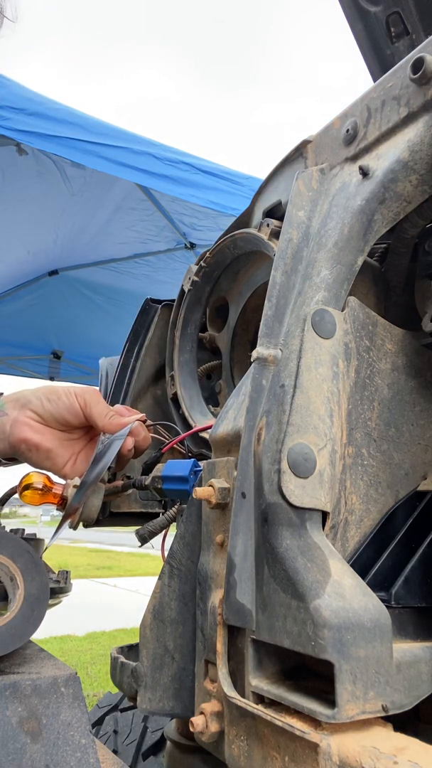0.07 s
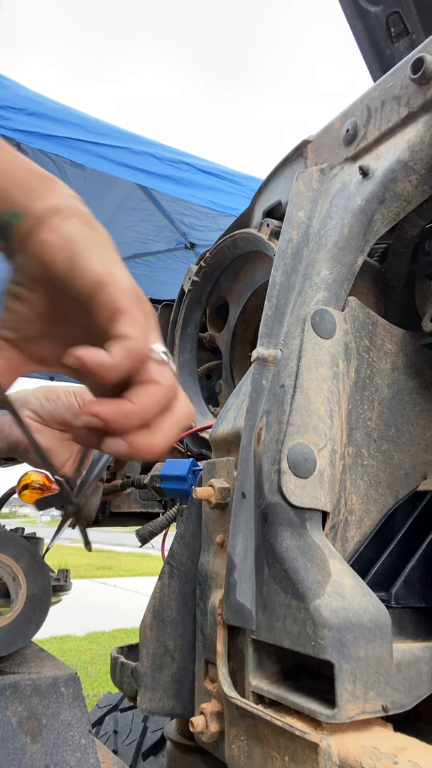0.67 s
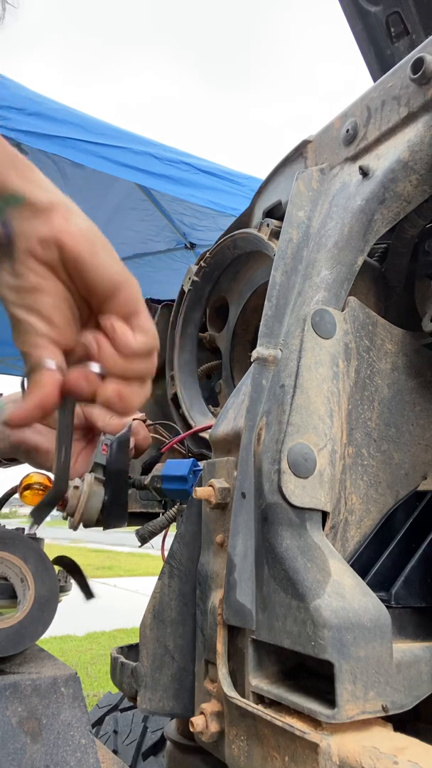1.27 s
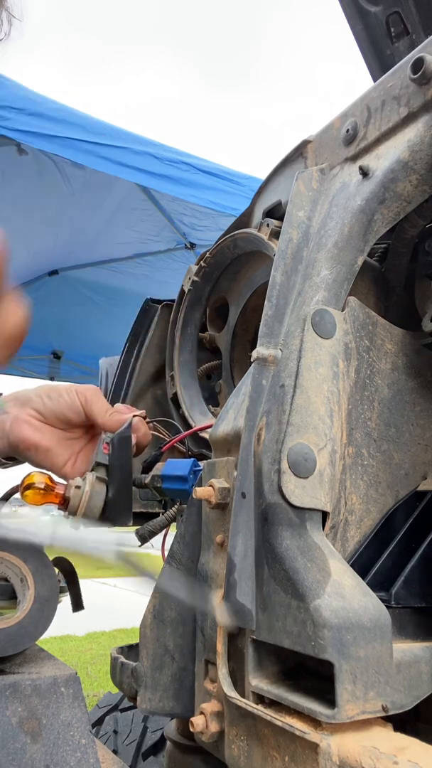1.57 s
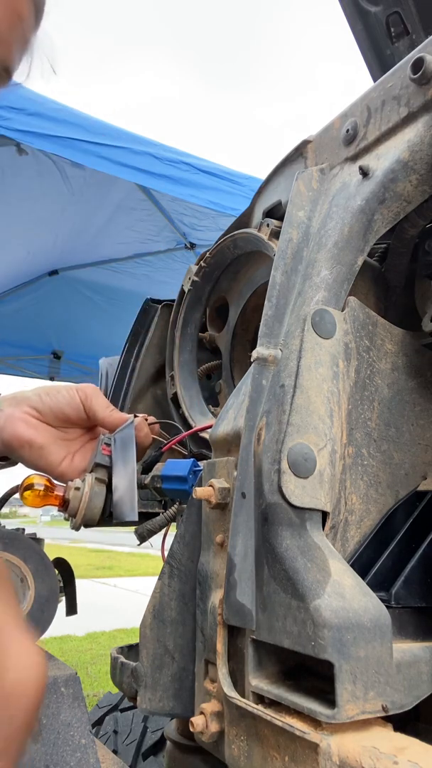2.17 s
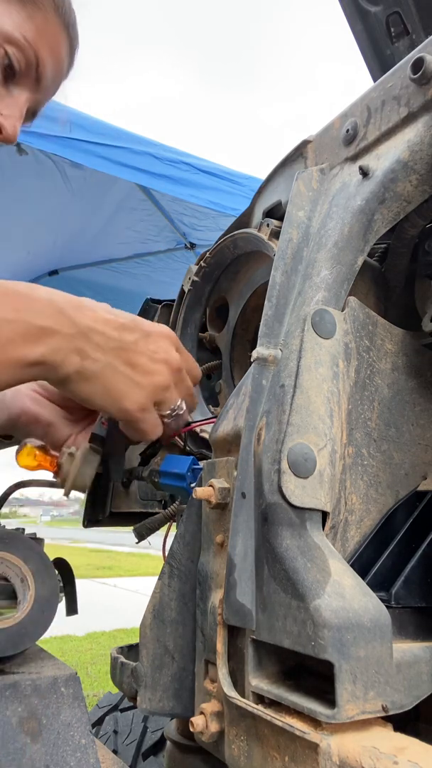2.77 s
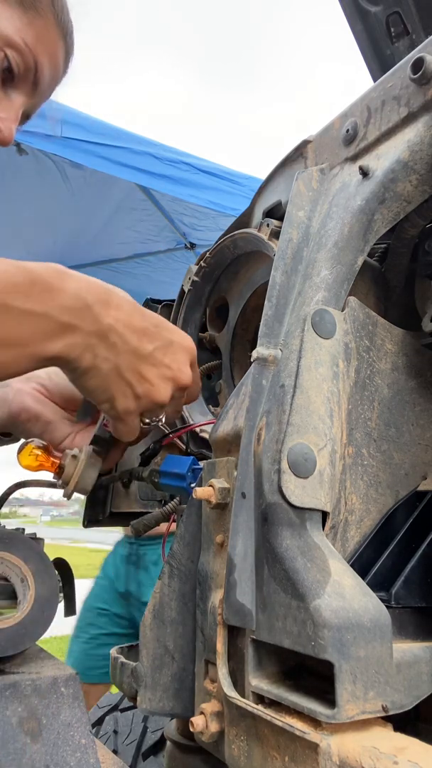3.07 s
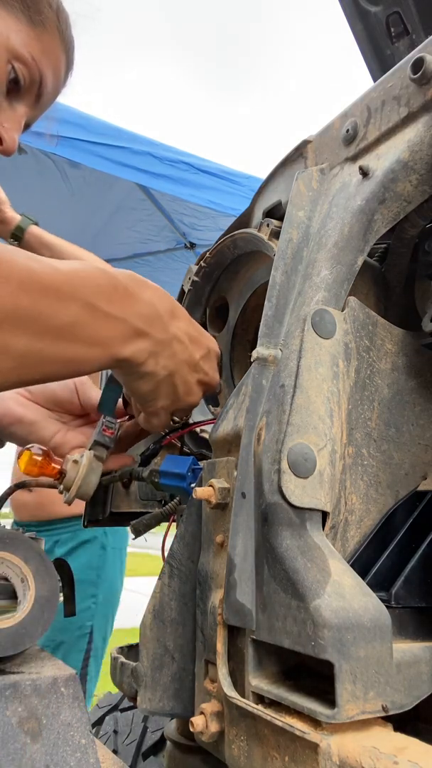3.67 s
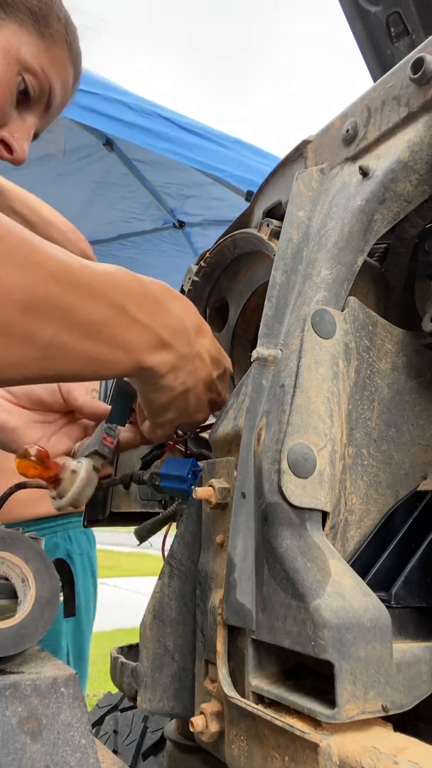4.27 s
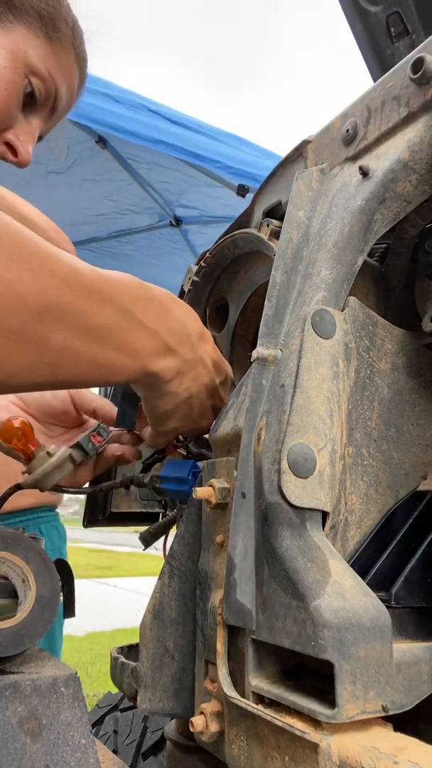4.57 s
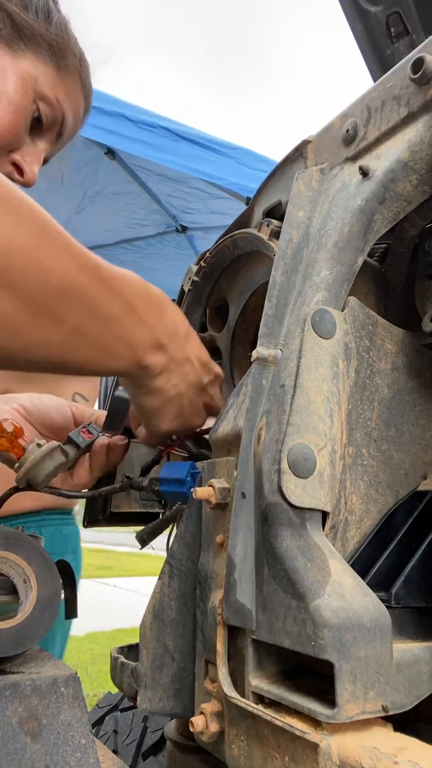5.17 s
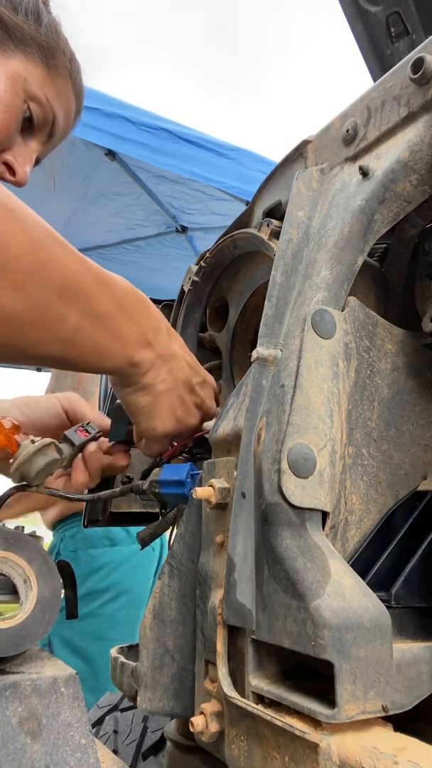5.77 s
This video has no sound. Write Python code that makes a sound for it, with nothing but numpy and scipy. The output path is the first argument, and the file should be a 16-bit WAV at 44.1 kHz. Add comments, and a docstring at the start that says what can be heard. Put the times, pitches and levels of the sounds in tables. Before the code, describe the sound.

Scissors clatter onto a ringing steel panel, then sticky tape peels in short hissing pulls, over a low outdoor rumble.

```python
"""Outdoors at a vehicle, a stereo microphone on its sheet-metal body, low rumble and far traffic behind.
Close by, a wire joint is being taped. A hollow plastic part knocks, scissors snip through tape,
then clatter down and set the steel panel under the microphone ringing. Fingers rustle at the wires,
terminals tick, and the tape rubs and peels in a few hissing pulls as its glue catches and lets go."""
import sys
import numpy as np
from scipy import signal
from scipy.fft import rfft, irfft, next_fast_len
from scipy.io import wavfile
from scipy.ndimage import uniform_filter1d

SR = 44100
rng = np.random.default_rng(int(sys.argv[2]) if len(sys.argv) > 2 else 0)


def to_wav(s):
    """Save 16-bit WAV."""
    ch = np.atleast_2d(s).T  # columns
    pcm = np.round(np.clip(ch, -1, 1) * 32767)  # PCM
    wavfile.write(sys.argv[1], SR, pcm.astype(np.int16))


N = 265702
TIME = np.arange(N) / SR

# spectrum of the outdoor background: f/Hz, level/dB
OUTDOOR_SPECTRUM = [(20, -31.5), (38, -16.5), (56, 3.5), (80, -7), (120, -5), (200, -13), (380, -21),
                    (800, -18.5), (1700, -26), (2600, -37.5), (5000, -86), (8400, -38.5), (11000, -58.5),
                    (16000, -67)]
# drift of the low rumble, taken about its mean: t/s, level/dB
RUMBLE_DRIFT = [(0.0, -50.5), (0.91, -49), (3.42, -53.5), (3.86, -52.5), (6.02, -51.5)]
# spectrum of skin on insulation: f/Hz, level/dB
SKIN_SPECTRUM = [(500, 4.5), (2000, -5.5), (4000, 16), (5300, -1), (6500, 6), (9000, 6), (13300, -4),
                 (15000, -16.5)]
# finger strokes along the wires: t/s, length/s, level/dB
FINGER_STROKES = [(0, 0.29, -68), (2.644, 0.42, -68.5), (3.47, 0.14, -61), (3.71, .16, -66.5),
                  (4.01, 0.51, -59), (4.843, 0.44, -71), (5.367, 0.22, -72.5), (5.937, 0.25, -64)]
# noise bands of small hard parts that hardly ring: f/Hz, level/dB, t60/s
TICK_BANDS = [(106, -76, 0.1), (432, -4.5, 0.15), (1030, -19.5, 0.13), (1790, -5, 0.045), (4170, 4, 0.068),
              (6660, 13.5, 0.022), (10400, -2.5, 0.015), (12700, 8, .02), (16100, -4, 0.0099)]
# the snip, and ticks of terminals and wire ends: t/s, level/dB, treble/dB, factor on t60
CLEAR_TICKS = [(0.339, -62.5, -4, 2), (.9764, -37, 16, 0.41), (1.0725, -39, -11.5, 0.58),
               (1.234, -51.5, -16, 1.9), (2.6098, -58, 1, 0.4), (3.9488, -38, -7, 0.8),
               (3.989, -35, 3, 0.39), (4.822, -40, -46, 1.04)]
# spectrum of tape letting go: f/Hz, level/dB
TAPE_SPECTRUM = [(60, 1), (200, 7), (400, -2.5), (850, -5.5), (1180, 0.5), (1400, -10), (1750, 3.5),
                 (2800, -7.5), (4200, 10), (5300, -9), (6300, 7.5), (8500, -5), (13200, -5.5), (15000, -34)]
# pulls and rubs of the tape: t/s, hold/s, level/dB, bass/dB, treble/dB
TAPE_PULLS = [(0.903, .05, -57, -6, 3.5), (1.045, 0.035, -65.5, 24.5, 6), (3.94, 0.019, -35, -26, -6),
              (4.128, 0.01, -37.5, -0.5, -9), (4.301, 0.011, -23, -6.5, -26), (4.311, 0.012, -34, 3.5, 12),
              (4.376, 0.08, -27, 1, -11.5), (4.513, 0.013, -33, 3.5, -5), (4.578, 0.035, -45, 1, -18),
              (4.783, 0.082, -55.5, 8, -33), (5.837, 0.0024, -47, 8.5, 2.5)]
# clear modes of the hollow plastic part: f/Hz, t60/s, level/dB at spots a, b
PLASTIC_MODES = [(1070, .1, -19, -14), (1221, .05, -10, -12), (1279, .1, 1.5, -10), (1360, .035, -5, -10),
                 (1443, .08, -2, -8), (1620, .04, -4, -3), (1766, .07, -15, -3), (1915, .08, -8, -4),
                 (3850, .06, -17, -10), (4250, .04, -11, -7)]
# its dense, weak modes: f/Hz, level/dB, t60/s
PLASTIC_BANDS = [(110, -26.5, 0.3), (238, -41, 0.26), (493, -27, 0.38), (940, -34, 0.11), (1280, 13, 0.075),
                 (1770, -37.5, 0.63), (3200, -26, 0.11), (4010, -4.5, 0.13), (5350, -66, 0.032),
                 (8900, -25.5, 0.071), (16100, -48, 0.046)]
# knocks and light taps on it: t/s, level/dB, bass/dB, treble/dB, spot
PLASTIC_KNOCKS = [(.1413, -6, -4, -0.5, "a"), (.1722, -15.5, 11, -5, "a"), (.1975, -29, 26, 5, "a"),
                  (1.2168, -24.5, 8, 8, "b"), (1.4572, -41.5, 3, 23.5, "b"), (4.303, -25, 7, -20, "a"),
                  (5.1303, -39, 2, 6, "b"), (5.1907, -40.5, 0, 5, "b")]
# clear modes of the steel panel under the microphone: f/Hz, t60/s, level/dB at spots a, b, c, d
STEEL_MODES = [(212, 0.3, -12, -11, -2, -14), (237, 0.7, -22, -22, -18, -20), (376, 0.28, -3, -14, -9, -12),
               (475, 0.21, 3, -15, -8, -11), (553, 0.22, -6, -6, -8, -10), (972, 0.21, -11, -13, -11, -5),
               (1078, 0.19, -1, 2, -13, -1), (1230, 0.19, 0, -15, -6, -4), (1445, 0.21, -5, -24, -3, -18),
               (1529, 0.3, -13, -6, -6, -8), (1650, 0.26, -9, -9, 3, -9), (1996, 0.21, -24, -5, -9, -10),
               (2047, 0.3, -20, -5, -7, -12), (2369, 0.07, -5, 7, -1, -2), (2487, 0.21, -18, -7, -14, -10),
               (2562, 0.7, -32, -22, -21, -19), (2589, 0.21, -16, -5, -11, -15),
               (2848, 0.14, -13, 3, -2, -9), (3074, 0.17, -25, -10, -7, -9), (3448, 0.07, -25, 1, -6, -4),
               (3549, 0.17, -21, -3, -12, -5), (3630, 0.07, -7, 3, -3, -7), (4094, 0.17, -17, -4, -3, -5),
               (4395, 0.1, -5, -13, -13, -7), (4471, 0.1, 0, -5, -5, 0), (4713, 0.1, -5, -18, -16, -7),
               (4838, 0.07, -3, -3, -12, 0), (5224, 0.07, -12, -7, -3, -5), (6667, 0.07, -34, -5, -4, -10),
               (8422, 0.11, -9, -15, -3, -6)]
# its dense, weak modes: f/Hz, level/dB, t60/s
STEEL_BANDS = [(100, -32, 0.21), (231.5, -4, 0.12), (433, -2.5, 0.36), (920, -9.5, 0.21), (1503, -0.5, .16),
               (2567, -17, 0.45), (4450, 5, 0.15), (5930, 2.5, 0.072), (9000, -9, 0.15),
               (12350, -6.5, 0.019), (16060, -47, .08)]
# two soft bumps on it, then the scissors land and bounce: t/s, level/dB, bass/dB, treble/dB, spot
STEEL_BLOWS = [(1.056, -60, 13, -26, "a"), (1.079, -54.5, 18, -31, "a"), (1.8346, -18, 0.5, -13.5, "a"),
               (1.947, -46.5, -3, -29.5, "d"), (2.0112, -22, -6.5, -2.5, "b"),
               (2.1094, -18.5, -0.5, 3, "c"), (2.1465, -24, -2.5, -21, "c"), (2.1662, -18.5, -6, 4.5, "d"),
               (2.196, -29, -1.5, -5.5, "c")]
# narrow treble dip on the struck sounds: f/Hz, level/dB
TREBLE_DIP = [(4700, -1), (5400, -12), (6200, -1)]

BOTH_HANDS_S, REACH_S = 2.4, 0.3  # when both hands are at work, and the fade up to it
LEFT_RIGHT = np.array([[1], [-1]])


def amp(db):
    """Decibels to gain."""
    return 10 ** (np.asarray(db) / 20)


def unit(x):
    """Scale to rms 1."""
    return x / np.sqrt(np.mean(x ** 2))


def at(hz, points, column=1):
    """Read a table on a log-frequency axis."""
    points = np.array(points)
    return np.interp(np.log(hz + 1e-9), np.log(points[:, 0]), points[:, column])


def curve(rows):
    """Join rows of t/s, value by straight lines."""
    return np.interp(TIME, *np.transpose(rows))


def colour(x, points):
    """Equalise by points of f/Hz, level/dB."""
    size = next_fast_len(x.shape[-1])
    gain = amp(at(np.fft.rfftfreq(size, 1 / SR), points))
    return irfft(rfft(x, size) * gain, size)[..., :x.shape[-1]]


def contact_tone(bass_db, treble_db):
    """The colour given by the place and hardness of one contact: f/Hz, level/dB."""
    presence_db = 0.19 * treble_db
    return [(350, bass_db), (1000, 0), (1500, 0),
            (3200, presence_db), (5000, presence_db), (9500, treble_db)]


def add(track, s, sound):
    """Mix a sound in at s seconds."""
    start = max(int(s * SR), 0)
    track[:, start:start + sound.shape[1]] += sound[:, :N - start]


def delay(x, samples):
    """The same sound, arriving later."""
    return np.concatenate([np.zeros_like(x[..., :samples]), x[..., :-samples]], axis=-1)


def outdoors():
    """A wavering low rumble, a little to the left, under the smooth wash of far traffic."""
    noise = rng.standard_normal(N) + 0.44 * rng.standard_normal((2, N))
    air = unit(colour(noise, OUTDOOR_SPECTRUM))
    rumble = signal.sosfiltfilt(signal.butter(2, 150, fs=SR, output="sos"), air)
    wash = air - rumble
    drift_db = curve(RUMBLE_DRIFT)
    lift_db = 2.04 + drift_db - np.mean(drift_db)
    return amp(-48) * (wash + rumble * amp(lift_db + LEFT_RIGHT))


def bodywork(x):
    """Two metal faces near the microphone throw the sound back and give it a hollow colour."""
    return x + amp(-21.5) * delay(x, samples=73) + amp(-19.5) * delay(x, samples=167)


def slips(size, per_s, spread_db, width):
    """Tiny releases of glue or skin, many a second and uneven in size."""
    grains = (rng.random(size) < per_s / SR) * amp(spread_db * rng.standard_normal(size))
    return grains * (rng.choice([-1, 1], size) + width * rng.standard_normal((2, size)))


def fingers():
    """Skin slides over insulation in a faint, grainy rustle that swells with each stroke."""
    one_hand_db, both_hands_db = -75, -69.5
    effort = amp(curve([(BOTH_HANDS_S - REACH_S, one_hand_db), (BOTH_HANDS_S, both_hands_db)]))
    for s, length, db in FINGER_STROKES:
        progress = np.clip((TIME - s) / length, 0, 1)
        effort += amp(db) * np.sin(np.pi * progress) ** 2
    grains = slips(N, per_s=3000, spread_db=3, width=0.09)
    return effort * unit(bodywork(colour(grains, SKIN_SPECTRUM)))


def noise_bands(size, width):
    """Yield f/Hz and stereo noise in half-octave steps; width sets how much the sides differ."""
    spectrum = rfft(rng.standard_normal(size) + width * rng.standard_normal((2, size)))
    octave = np.log2(np.fft.rfftfreq(size, 1 / SR) + 1e-9)
    for hz in 96 * 2 ** np.arange(0, 7.6, 0.5):
        window = np.sqrt(np.maximum(1 - 2 * abs(octave - np.log2(hz)), 0))
        yield hz, unit(irfft(spectrum * window, size))


def dense_modes(blows, bands, t60_scale, crack_db, crack_s, width, size):
    """Each blow opens with a crack and dies away in weak modes, too dense to tell apart."""
    out, t = np.zeros((2, N)), np.arange(size) / SR
    attack = 1 - np.exp(-t / 0.000431)
    crack = 1 + amp(crack_db) * np.exp(-t / crack_s)
    for s, db, bass_db, treble_db, *_ in blows:
        tone, sound = contact_tone(bass_db, treble_db), np.zeros((2, size))
        for hz, noise in noise_bands(size, width):
            t60 = t60_scale * at(hz, bands, column=2)
            envelope = np.exp(-np.log(1000) * t / t60) * (crack if hz > 900 else 1)
            band_rms = amp(at(hz, bands) + at(hz, tone)) * np.sqrt(np.mean(envelope ** 2))
            sound += band_rms * unit(noise * envelope)
        add(out, s, amp(db) * attack * sound)
    return out


def clear_modes(blows, modes, t60_scale, phase_spread):
    """Each blow starts the object's clear modes, as strongly as its spot drives them."""
    out, t = np.zeros((2, N)), np.arange(SR * 3 // 5) / SR
    attack = 1 - np.exp(-t / 0.0023)
    for s, db, *_, spot in blows:
        sound = np.zeros((2, len(t)))
        for hz, t60, *spot_db in modes:
            # each mode reaches the two microphone ports with its own phase
            phase = rng.uniform(0, 2 * np.pi) + phase_spread * rng.standard_normal((2, 1))
            fade = np.exp(-np.log(1000) * t / (t60 * t60_scale))
            sound += amp(spot_db["abcd".index(spot)]) * fade * np.sin(2 * np.pi * hz * t + phase)
        add(out, s, amp(db) * attack * sound)
    return out


def small_parts():
    """Blades, terminals and wire ends click: a few clearly, others faintly while both hands work."""
    busy_s = N / SR - BOTH_HANDS_S
    faint_per_s = 3
    draws = rng.random((int(faint_per_s * busy_s), 2))
    faint_ticks = [(BOTH_HANDS_S + busy_s * when, -64 + 4 * force, -9, 2.5) for when, force in draws]
    out = np.zeros((2, N))
    for s, db, treble_db, t60_scale in CLEAR_TICKS + faint_ticks:
        out += dense_modes([(s, db, 0, treble_db)], TICK_BANDS, t60_scale,
                           crack_db=0, crack_s=0.0002, width=0.055, size=6000)
    return amp(-5) * out


def tape():
    """Each pull swells, holds and dies away while the glue catches and lets go in dense slips."""
    out, t = np.zeros((2, N)), np.arange(SR // 2) / SR
    for s, hold_s, db, bass_db, treble_db in TAPE_PULLS:
        # a longer pull gathers speed and loses it more slowly
        rise_s, fall_s = 0.003 + 0.54 * hold_s, 0.022 + 0.27 * hold_s
        swell = np.minimum(t / rise_s, 1) ** 0.44
        fade = np.exp(-np.maximum(t - rise_s - hold_s, 0) / fall_s)
        catch_db = 2 * unit(uniform_filter1d(rng.standard_normal(len(t)), size=130))
        glue = amp(catch_db) * slips(len(t), per_s=8700, spread_db=3.5, width=0.14)
        hiss = unit(bodywork(colour(glue, TAPE_SPECTRUM)))
        add(out, s, amp(db) * swell * fade * colour(hiss, contact_tone(bass_db, treble_db)))
    return out


def plastic_part():
    """The hollow plastic part answers each knock with a sharp crack and a short, nasal ring."""
    ring = clear_modes(PLASTIC_KNOCKS, PLASTIC_MODES, t60_scale=0.55, phase_spread=0.7)
    body = dense_modes(PLASTIC_KNOCKS, PLASTIC_BANDS, t60_scale=0.55,
                       crack_db=6, crack_s=0.00082, width=0.6, size=10000)
    return amp(0.5) * ring + amp(-9) * body


def scissors_on_panel():
    """The steel right under the microphone rings as it is bumped and as the scissors land and bounce."""
    ring = clear_modes(STEEL_BLOWS, STEEL_MODES, t60_scale=0.82, phase_spread=1.0)
    body = dense_modes(STEEL_BLOWS, STEEL_BANDS, t60_scale=0.84,
                       crack_db=-1.5, crack_s=0.00092, width=0.76, size=20000)
    return amp(1) * ring + amp(-4.5) * body


def scene():
    """At the microphone: the plastic part reaches both ports together, the rest the right port first."""
    metal = colour(scissors_on_panel() + small_parts(), TREBLE_DIP)
    left, right = metal + tape() + fingers() + outdoors()
    plastic = colour(plastic_part(), TREBLE_DIP)
    ports = np.array([delay(left, samples=4), right]) + plastic
    return ports * amp(0.74 * LEFT_RIGHT)  # the image leans slightly left


def record(dry):
    """The recorder rounds the highest peaks and cuts the top."""
    top_cut = signal.ellip(8, 0.2, 80, 15800, fs=SR, output="sos")
    return signal.sosfilt(top_cut, np.tanh(dry))


dry = scene()
out = record(dry)
to_wav(out)
```